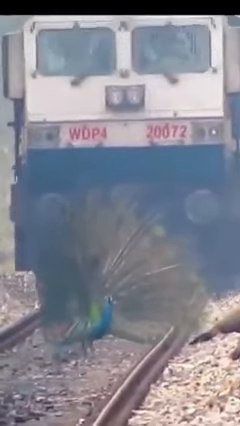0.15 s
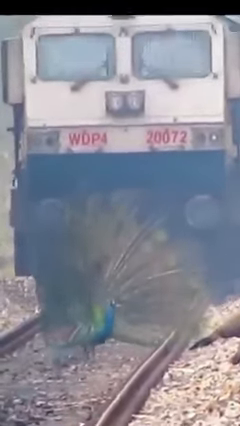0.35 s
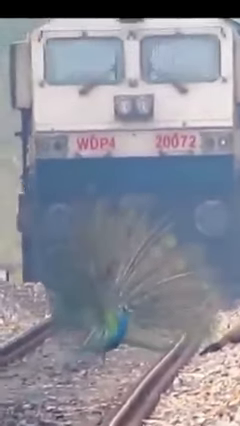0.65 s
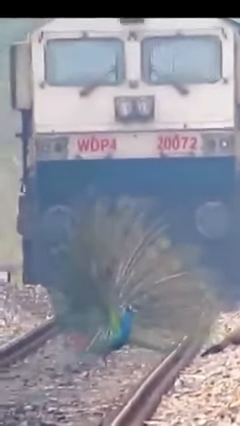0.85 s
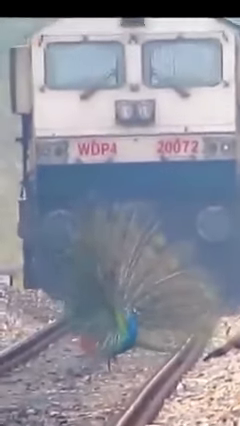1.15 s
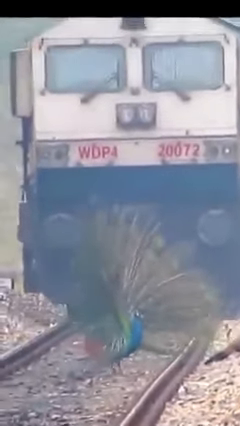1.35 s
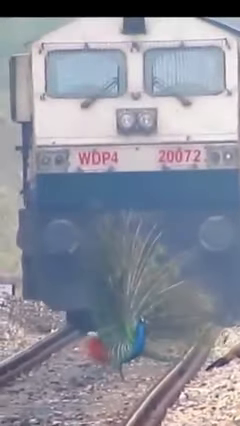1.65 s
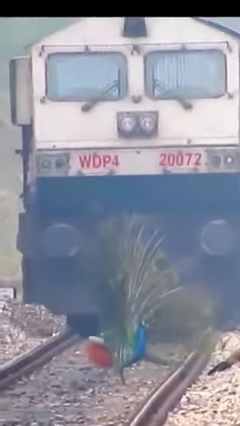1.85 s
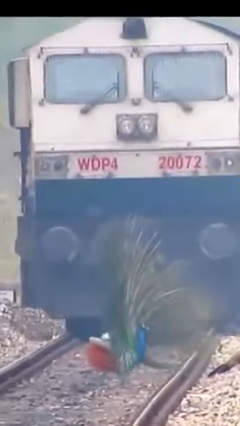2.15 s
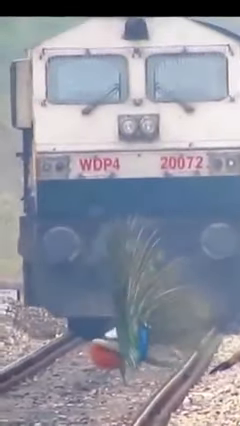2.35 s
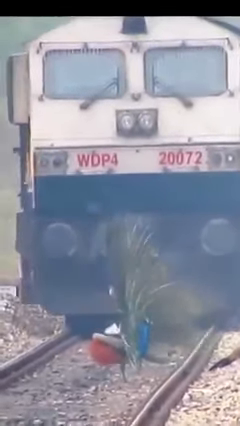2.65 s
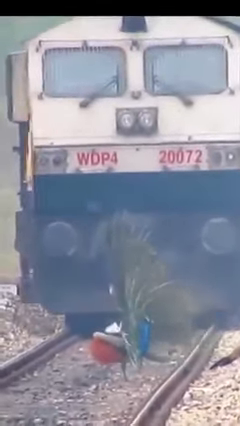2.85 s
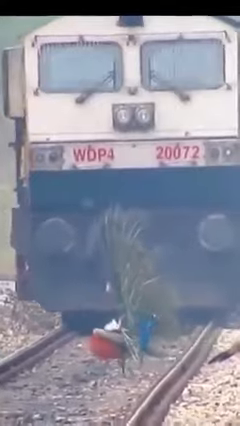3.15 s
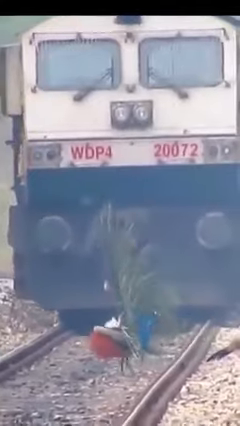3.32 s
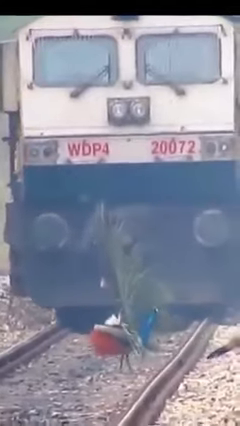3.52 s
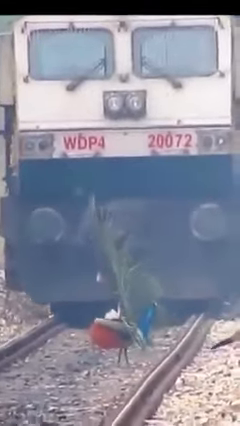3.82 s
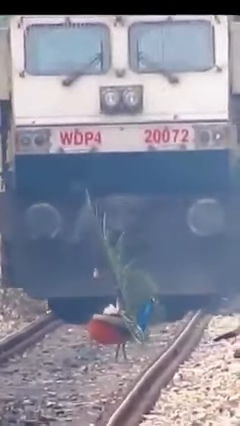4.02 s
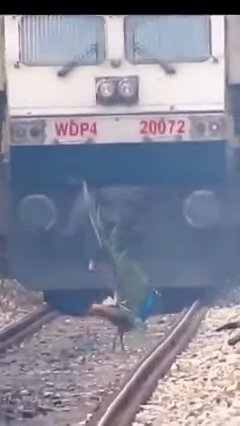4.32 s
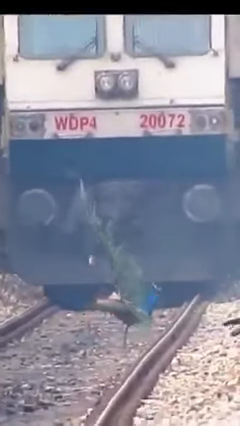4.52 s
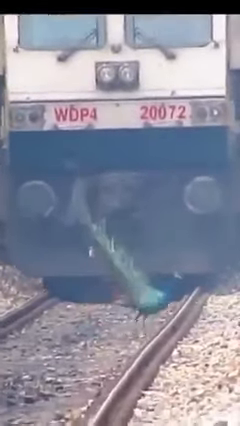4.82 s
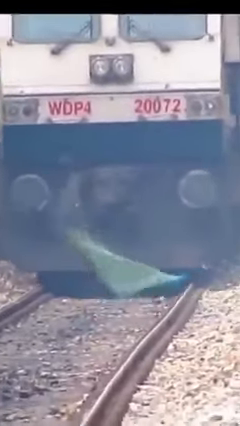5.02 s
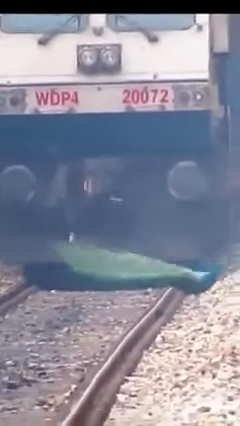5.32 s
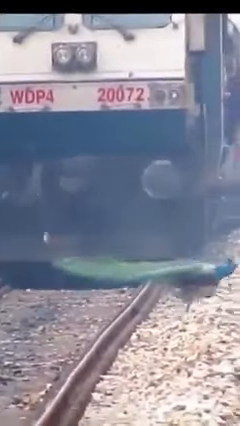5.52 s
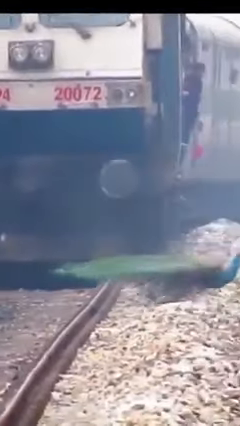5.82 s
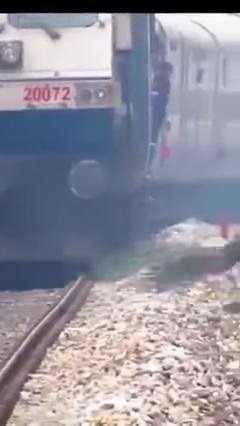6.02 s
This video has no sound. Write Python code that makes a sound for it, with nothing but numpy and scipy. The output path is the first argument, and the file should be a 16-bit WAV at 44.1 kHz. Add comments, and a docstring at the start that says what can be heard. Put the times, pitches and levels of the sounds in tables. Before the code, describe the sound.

Fast, uneven chuffing and bright exhaust hiss ride on a throbbing engine rumble; near the start a two-note air horn sounds once and echoes.

```python
"""A diesel locomotive creeps closer on open track, its engine hissing and rumbling from the start.
Filtered noise makes the exhaust, which chuffs in threes, one strong and two weak, speeding up slightly.
Early on a two-tone air horn, built from harmonics, blows once; a hillside sends it back smeared and sharper.
Throughout, the two microphone ports of a handheld recorder colour the sound very differently."""
import sys
import numpy as np
from scipy import signal
from scipy.fft import rfft, irfft
from scipy.io import wavfile

SR = 44100
rng = np.random.default_rng(int(sys.argv[2]) if len(sys.argv) > 2 else 0)


def linear_from_db(decibels):
    """Turn decibels (scalar or array-like) into linear amplitude factors; 0 gives 1."""
    return 10 ** (np.asarray(decibels, float) / 20)


def digitize_waveform(pressure):
    """Quantize a signal to 16-bit integers and store it at the path in sys.argv[1].

    Rows of a 2-D input are taken as channels; values are limited to [-1, 1].
    """
    field = np.atleast_2d(pressure).T
    bounded = np.clip(field, -1, 1)
    quanta = np.round(bounded * 32767).astype(np.int16)
    wavfile.write(sys.argv[1], SR, quanta)


N = 272095
T = np.arange(N) / SR
HZ = np.maximum(np.fft.rfftfreq(N, 1 / SR), 1)

# Engine speed. Each row: time in seconds, chuff cycles per second.
SPEED = [(0, 5.2072), (1.5, 5.2072), (4.5, 5.3554), (6.2, 5.3554)]
FIRST_CHUFF_S = .1336   # the first strong chuff

# Hiss between the chuffs, before the jet colour. Each row: time in seconds, body in dB, sizzle in dB.
HISS = [(0, -29.5, -24.5), (.8, -30, -26), (2.1, -29, -28.5), (3.2, -28.5, -24), (4.2, -29.5, -22.5),
        (5.4, -26, -25.5), (6.17, -30.5, -29)]
# Drive of the strong chuffs as the engine nears. Each row: time in seconds, body in dB, sizzle in dB.
CHUFF_LEVEL = [(0, -21, -12.5), (.7, -25, -19.5), (1.2, -16.5, -19), (2.2, -28, -16.5), (3, -17.5, -17),
               (3.6, -25.5, -13), (4.3, -20.5, -11), (5.3, -17, -11.5), (6.17, -19.5, -16)]
SECOND_CHUFF_DB, THIRD_CHUFF_DB = -10.5, -7.5   # each relative to the chuff before it
CHUFF_SPREAD_DB, WEAK_SPREAD_DB = 0.86, 1   # chance from turn to turn
# Colour of the exhaust jet, before an overall lift. Each row: frequency in Hz, relative gain in dB.
JET = [(200, -21.5), (400, 2.5), (600, -1.5), (730, 1), (920, -11), (1200, 3.5), (2000, -1), (5000, -3.5),
       (6500, -9), (7500, -17.5), (9000, -27), (11000, -44), (16000, -59.5)]
# Boost of the bright band against the rest of the sizzle. Each row: time in seconds, gain in dB.
BRIGHT = [(0, -3.5), (1.5, -1), (2.9, -2.5), (3.7, -1), (6.17, 4)]
BRIGHT_HZ, BRIGHT_OCTAVES = 4400, 0.18   # its centre and its bell width

# Spectrum of the engine rumble. Each row: frequency in Hz, relative density in dB per Hz.
RUMBLE = [(15, -57), (25, -22.5), (43, -9.5), (85, -9), (119, -3), (155, 1), (226, -5), (379, -11.5),
          (424, -5), (592, -16), (700, -13.5), (910, -29), (1540, -120)]
# Loudness of the rumble noise ahead of the ports. Each row: time in seconds, rms level in dB.
RUMBLE_LEVEL = [(0, -27), (2, -25.5), (4, -25.5), (6.17, -25.5)]
# Engine orders standing out of the rumble. Each entry: multiple of the chuff cycle.
ENGINE_ORDERS = [15, 18, 28, 30, 38, 58]
# Loudness of those orders ahead of the ports. Each entry: mean level in dB rms.
ENGINE_ORDERS_DB = [-38, -39, -41, -34.5, -43, -42]
# Exhaust pipe modes struck by each firing. Each row: frequency in Hz, drive in dB, t60 in seconds.
STACK = [(93, -23.5, 0.27), (162.5, -27.5, 0.16), (209.4, -19, 0.031), (302, -26, 0.044)]

# Horn pipes: valve opens in s, shuts in s, pitch in Hz, sharp at first by Hz, settling time in s.
LOW_BLAST = (.215, 1.41, 302.6, 7.4, 0.0891)
HIGH_BLAST = (0.2647, 1.42, 446, 3.5, 0.213)
ATTACK_S, ATTACK_PER_PARTIAL_S = 0.017, 0.0035   # higher partials build up later
LOW_RELEASE_S, HIGH_RELEASE_S = 0.028, .05   # the fundamental falls by 9 dB; higher partials die sooner
# The low pipe's swelling. Each row: time in seconds, fundamental in dB, octave in dB.
LOW_SWELL = [(.25, -16.5, -33), (.35, -20.5, -26), (.47, -37, -27.5), (.63, -30, -19), (.77, -22, -19.5),
             (.9, -25, -16), (1.0, -21.5, -19), (1.09, -29.5, -22), (1.39, -24, -20)]
# The high pipe's swelling. Each row: time in seconds, fundamental in dB, upper overtones in dB.
HIGH_SWELL = [(.3, -16.5, -31), (.46, -13.5, -22), (.76, -13, -24.5), (.87, -13, -30), (1.0, -11.5, -30),
              (1.24, -16.5, -25), (1.4, -15.5, -24.5)]
# Low pipe's partials from the third on. Each entry: dB relative to its overtone level.
LOW_OVERTONES_DB = [-10.5, -2, -6, -10.5, -14.5, -19.5, -22.5, -26.5, -31.5]
# High pipe's partials from the third on. Each entry: dB relative to its overtone level.
HIGH_OVERTONES_DB = [-0.5, -11.5, -14.5, -4, -33.5, -9, -20, -22.5]
LOW_UPPER_DB, HIGH_OCTAVE_DB = -27, -27.5   # low pipe's settled overtone level, high pipe's second partial
LOW_ACCENT_DB, LOW_ACCENT_S = 2, 0.13   # the low pipe starts brassier and mellows

# Hillside echo: delay as the blast ends, and pitch ratio (the path shortens as the engine nears the slope).
ECHO_S, ECHO_PITCH = .24, 1.013
ECHO_DB, ECHO_SMEAR_S, ECHO_ROUGH = -7.5, 0.059, 0.59
ECHO_CUT_HZ, ECHO_TOP_HZ = 530, 2200   # the slope returns less outside this range

# Microphone ports. Each row: frequency in Hz, left gain in dB, right gain in dB, likeness from 0 to 1.
PORTS = [(303, 0.5, 0, 0.97), (507, -4.5, -6.5, 0.85), (1006, 4.5, 7, 0.79), (1330, 3.5, -8, 0.4),
         (1710, 13.5, 3.5, 0.76), (2210, 3.5, -4, 0), (2740, -3.5, 1.35, 0.4), (3150, 1.2, 6.5, 1),
         (3580, -14, -1.5, 0.6), (4060, -12.5, 2, 0.3), (4304, -14, 8.5, 0.1), (4280, -14, 8.5, 0.3),
         (4920, -6.5, 3, 1), (5640, -14.5, -2, 0.1), (6080, -6, -0.5, 0.5), (6600, -10.5, -7.5, 0.02)]
# Phase by which the left port leads (negative lags). Each row: frequency in Hz, phase in radians.
LEAD = [(100, 0), (860, -.4), (1210, -.2), (1640, -2.6), (2000, -3.4), (2500, -5.8), (3100, -10.4),
        (3700, -15.8), (4220, -17.2), (7000, -16.5)]


def rms_one(x):
    """Scale to unit rms."""
    return x / np.sqrt(np.mean(x ** 2) + 1e-20)


def in_time(rows):
    """Columns of a curve at every sample."""
    s, *columns = np.transpose(rows)
    return [np.interp(T, s, c) for c in columns]


def in_pitch(rows):
    """Columns of a spectrum at every FFT bin, joined up on a log frequency scale."""
    hz, *columns = np.transpose(rows)
    return [np.interp(np.log(HZ), np.log(hz), c) for c in columns]


def drift(rate):
    """Random wandering of spread 1: noise through two equal low-pass poles at rate Hz."""
    r = np.exp(-80 * np.pi * rate / SR)   # worked out at every 40th sample
    white = rng.standard_normal(N // 40 + 2002)
    slow = signal.lfilter([1], [1, -2 * r, r * r], white)[2000:]   # skip the run-in
    return np.interp(np.arange(N) / 40, np.arange(len(slow)), rms_one(slow))


def at_ports(mid, side):
    """A wide source: the two ports share part of it, as much as their likeness at each frequency."""
    alike = np.clip(in_pitch(PORTS)[2], 0, 1)
    shared = np.sqrt(1 + alike) * rfft(mid)
    opposed = np.sqrt(1 - alike) * rfft(side) * [[1], [-1]]
    return irfft(shared + opposed, N) / np.sqrt(2)


def cycle():
    """Starts of whole chuff turns in seconds, carried on past both ends, and the running turn count."""
    turns = np.cumsum(in_time(SPEED)[0]) / SR
    turns = turns - np.interp(FIRST_CHUFF_S, T, turns) + 1
    s = np.interp(np.arange(1, int(turns[-1]) + 1), turns, T)
    return np.r_[2 * s[0] - s[1], s, 2 * s[-1] - s[-2]], turns


def chuff_levels(s):
    """Strong-chuff body and sizzle dB of each turn, and its second-chuff dB: slow trend plus chance."""
    when, *trend = np.transpose(CHUFF_LEVEL)
    luck = np.clip(rng.standard_normal((len(s), 3)), -2, 2)
    strong = np.array([np.interp(s, when, c) for c in trend]) + CHUFF_SPREAD_DB * luck[:, :2].T
    return strong, SECOND_CHUFF_DB + WEAK_SPREAD_DB * luck[:, 2]


def puff(rise_s, first_s, fall_s, tail_db, tail_s):
    """Power shapes of a chuff: the valve cracks open and leaves a faint tail; the main blast follows."""
    t = np.arange(int(.1 * SR)) / SR
    tail = linear_from_db(2 * tail_db) * np.exp(-t / tail_s)
    crack = (1 - np.exp(-t / rise_s)) ** 2 * (np.exp(-t / first_s) + tail)
    blast = (t / fall_s * np.exp(1 - t / fall_s)) ** 2
    return crack, blast


def chuff_power():
    """Body and sizzle power of the chuffs: each third of a turn sets off a crack, then a blast."""
    s = cycle()[0]
    strong_db, second_db = chuff_levels(s[:-1])
    kicks = np.zeros((2, N + SR))
    for third, weaker_db in enumerate([0, second_db, second_db + THIRD_CHUFF_DB]):
        at = ((s[:-1] + third / 3 * np.diff(s)) * SR).astype(int)
        kicks[:, at[at >= 0]] = linear_from_db(2 * (strong_db + weaker_db))[:, at >= 0]
    crack, blast = puff(rise_s=.004, first_s=.012, fall_s=.005, tail_db=-10, tail_s=.03)
    luck = np.clip(rng.standard_normal(N + SR), -2, 2)
    late_kicks = np.roll(kicks, int(0.015 * SR), axis=1) * linear_from_db(2.5 * luck)   # no two blasts alike
    cracks = signal.oaconvolve(kicks[:, :N], crack[None])[:, :N]
    blasts = signal.oaconvolve(late_kicks[:, :N], blast[None])[:, :N]
    return cracks + blasts


def exhaust(patchy_db, crackle_db, split_hz):
    """Jet noise in third-octave bands; chuffs ride on the hiss, low bands follow body, high bands sizzle."""
    hiss = linear_from_db(2 * np.array(in_time(HISS)))
    body, sizzle = np.log(hiss + np.abs(chuff_power())) / 2   # log amplitude
    steady = np.log(hiss[0]) / 2
    lumps = linear_from_db(crackle_db * drift(300))   # turbulence comes in small lumps
    white = rng.standard_normal((2, 2, N)) * lumps
    bright_db = in_time(BRIGHT)[0]
    out, edges = 0, 200 * 2 ** (np.arange(20) / 3)
    for k, (low, high) in enumerate(zip(edges, edges[1:])):
        share = 1 / (1 + (split_hz / low) ** 6)
        chuffing = np.clip(np.log2(high / 350), 0, 1)   # the lowest bands hardly pulse
        low_level = chuffing * body + (1 - chuffing) * steady
        level = (1 - share) * low_level + share * sizzle
        band_pass = signal.butter(2, [low, high], "band", fs=SR, output="sos")
        band = signal.sosfilt(band_pass, white[k % 2])
        octaves_off = np.log2(np.sqrt(low * high) / BRIGHT_HZ)
        bright = np.exp(-(octaves_off / BRIGHT_OCTAVES) ** 2) * bright_db
        patches = patchy_db * (drift(2.6) / 2 + drift(4.1) + drift(36))
        out = out + band * np.exp(level) * linear_from_db(bright + patches)
    colour = linear_from_db(in_pitch(JET)[0] + 5)   # overall lift of the jet noise, 5 dB
    return at_ports(*irfft(rfft(out) * colour, N))


def stack_thump(turns, late_s, uneven_db):
    """Three firings a turn strike the exhaust pipe unevenly, and its damped modes ring."""
    fired = np.flatnonzero(np.diff(np.floor(3 * turns))) + int(late_s * SR)
    stray = (rng.normal(0, 0.0029, len(fired)) * SR).astype(int)
    fired = np.clip(fired + stray, 0, N - 1)
    kicks = np.full(N, 1e-18)
    kicks[fired] = linear_from_db(uneven_db * rng.standard_normal(len(fired)))
    soft_push = signal.butter(3, [110, 600], "band", fs=SR, output="sos")
    kicks = signal.sosfilt(soft_push, kicks)
    out = 0
    for hz, db, t60 in STACK:
        r, w = linear_from_db(-60 / (t60 * SR)), 2 * np.pi * hz / SR
        out = out + linear_from_db(db) * signal.lfilter([0, np.sin(w)], [1, -2 * r * np.cos(w), r * r], kicks)
    return out


def rumble(throb_db, waver_db, wander, late_s, uneven_db):
    """Wide low noise, with wavering sine engine orders and the stack's thumps in the middle."""
    turns = cycle()[1]
    noise = rms_one(irfft(rfft(rng.standard_normal((2, N))) * linear_from_db(in_pitch(RUMBLE)[0]), N))
    noise *= linear_from_db(in_time(RUMBLE_LEVEL)[0] + throb_db * drift(12))
    orders = 0
    for k, db in zip(ENGINE_ORDERS, ENGINE_ORDERS_DB):
        peak = np.sqrt(2) * linear_from_db(db + waver_db * drift(6.7))
        orders = orders + peak * np.sin(2 * np.pi * k * turns + wander * drift(0.61))   # wander in radians
    return at_ports(*noise) + orders + stack_thump(turns, late_s, uneven_db)


def pipe(blast, release_s, levels_db, flutter_db, jitter):
    """A diaphragm horn: clean harmonics, each flickering a little as the air between moves."""
    opens, shuts, hz, sharp_hz, settle_s = blast
    since, after = np.maximum(T - opens, 0), np.maximum(T - shuts, 0)
    pitch = hz + sharp_hz * np.exp(-since / settle_s)
    phase = 2 * np.pi * np.cumsum(pitch * (1 + jitter * drift(31.4))) / SR
    out = 0
    for k, db in enumerate(levels_db):
        attack = (1 - np.exp(-since / (ATTACK_S + k * ATTACK_PER_PARTIAL_S))) ** 2
        release = np.exp(-(after * (k + 1) ** .5 / release_s) ** 2)
        peak = np.sqrt(2) * linear_from_db(db + flutter_db * drift(5.3))
        out = out + attack * release * peak * np.cos((k + 1) * phase + 0.17 * k)
    return out


def hillside(blown):
    """A late, sharper echo, smeared by many small reflectors that die away over the slope."""
    end = HIGH_BLAST[1]
    back = np.interp(end + (T - end - ECHO_S) * ECHO_PITCH, T, blown)
    slope_tone = signal.butter(1, [ECHO_CUT_HZ, ECHO_TOP_HZ], "band", fs=SR, output="sos")
    back = signal.sosfilt(slope_tone, back)
    back *= 1 + ECHO_ROUGH * drift(49)   # leaves and moving air roughen the echo
    lag = np.arange(int(.3 * SR)) / SR
    slope = rng.standard_normal((2, len(lag))) * np.exp(-lag / ECHO_SMEAR_S)
    slope /= np.sqrt(np.mean(np.sum(slope ** 2, axis=1)))
    echo = signal.oaconvolve(back[None], slope)[:, :N]
    return linear_from_db(ECHO_DB) * at_ports(*echo)


def horn():
    """Two pipes blown together, each balanced between the ports, and their echo from the hillside."""
    first_db, upper_db = in_time(HIGH_SWELL)
    since = np.maximum(T - LOW_BLAST[0], 0)
    brassy_db = LOW_UPPER_DB + LOW_ACCENT_DB * np.exp(-since / LOW_ACCENT_S)
    low_db = in_time(LOW_SWELL) + [brassy_db + db for db in LOW_OVERTONES_DB]
    high_db = [first_db, HIGH_OCTAVE_DB] + [upper_db + db for db in HIGH_OVERTONES_DB]
    low = pipe(LOW_BLAST, LOW_RELEASE_S, low_db, flutter_db=3.0, jitter=0.0014)
    high = pipe(HIGH_BLAST, HIGH_RELEASE_S, high_db, flutter_db=1.5, jitter=0.00046)
    direct = low * linear_from_db([[-.3], [.3]]) + high * linear_from_db([[1.6], [-1.6]])
    direct[0] = np.roll(direct[0], shift=4)   # the horn stands a little nearer the right port
    return direct + hillside(low + high)


def scene():
    """Exhaust, rumble and horn at the two ports."""
    engine = rumble(throb_db=1.5, waver_db=1.5, wander=1.31, late_s=.03, uneven_db=3.5)
    return exhaust(patchy_db=1.92, crackle_db=1.0, split_hz=2460) + engine + horn()


def top_cut(x):
    """Nothing passes above the cut-off."""
    return signal.sosfilt(signal.butter(12, 15160, fs=SR, output="sos"), x)


def record(dry):
    """Each port has its own resonances and the left one lags; peaks are rounded."""
    left_db, right_db = in_pitch(PORTS)[:2]
    left = linear_from_db(left_db) * np.exp(1j * in_pitch(LEAD)[0])
    heard = irfft(rfft(dry) * [left, linear_from_db(right_db)], N)
    mix = np.clip(2.5 * np.tanh(heard / 2.5), -1, 1)
    return top_cut(mix)


dry = scene()
out = record(dry)
digitize_waveform(out)
```